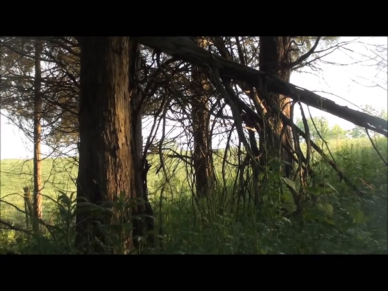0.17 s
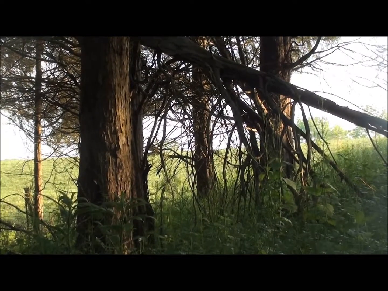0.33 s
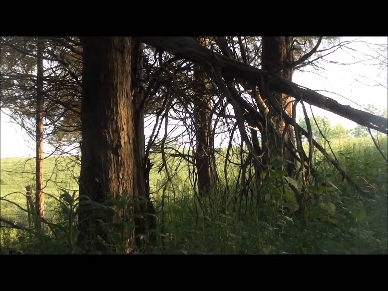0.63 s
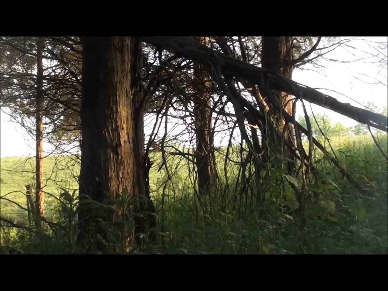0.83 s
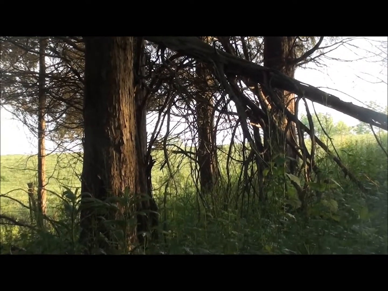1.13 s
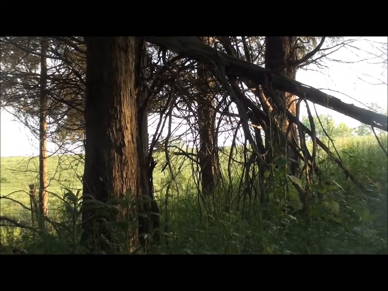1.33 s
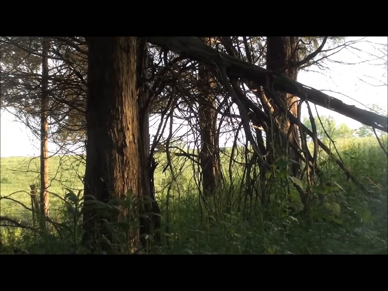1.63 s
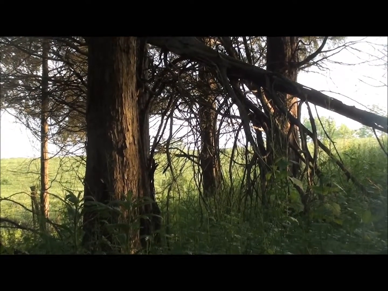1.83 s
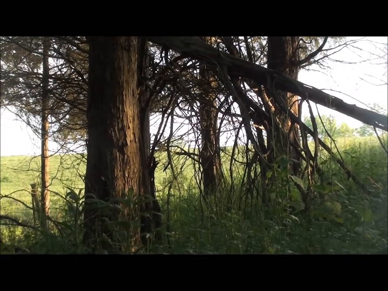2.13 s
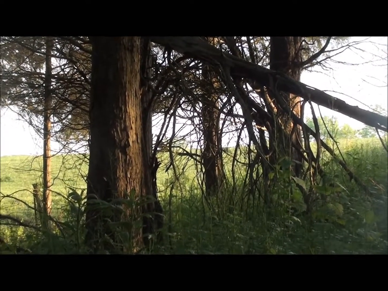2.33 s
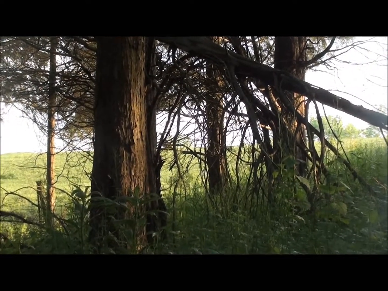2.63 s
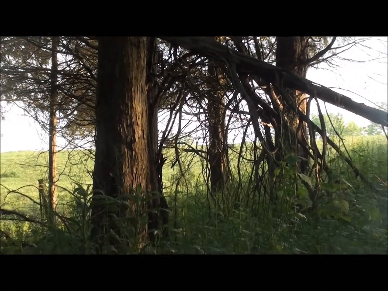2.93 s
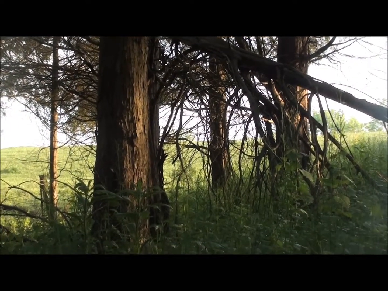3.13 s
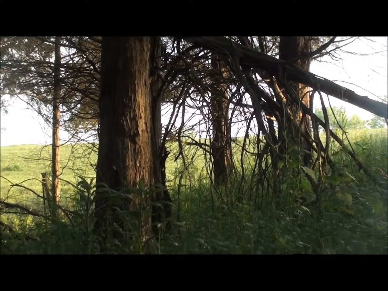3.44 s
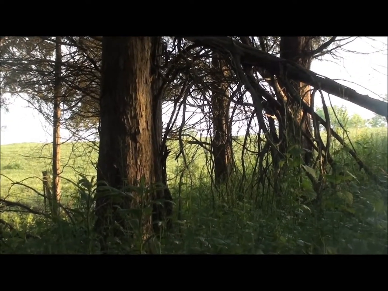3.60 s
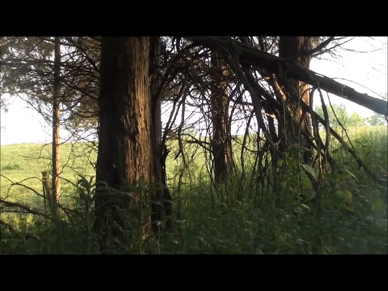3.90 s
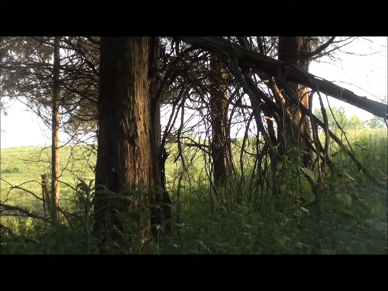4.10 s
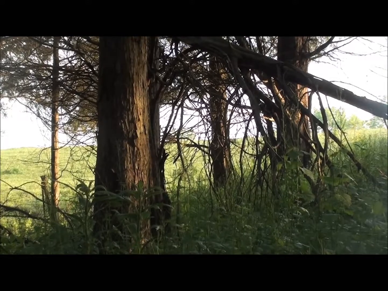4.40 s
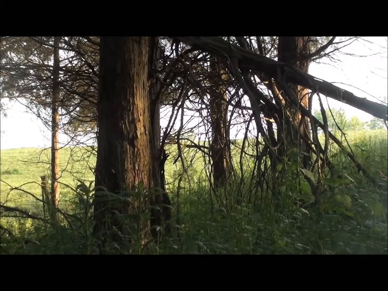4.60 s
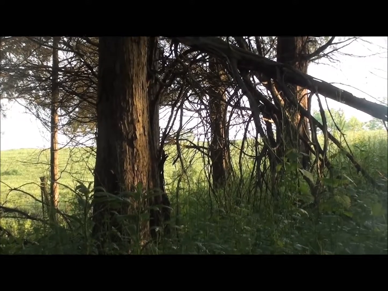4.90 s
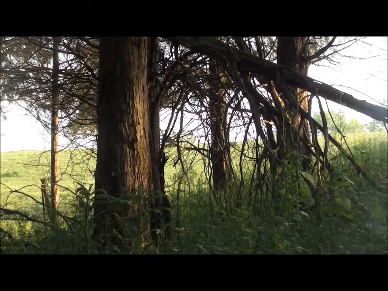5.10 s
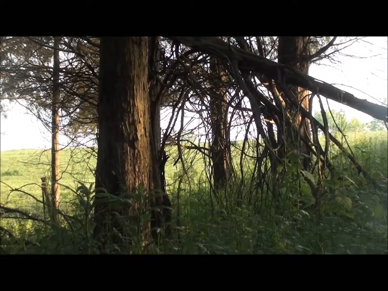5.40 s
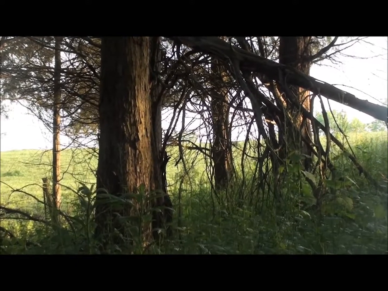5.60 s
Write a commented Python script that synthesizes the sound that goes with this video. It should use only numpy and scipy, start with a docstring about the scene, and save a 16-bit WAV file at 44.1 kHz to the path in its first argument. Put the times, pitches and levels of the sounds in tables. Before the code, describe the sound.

Quiet outdoor hush, then loud harsh turkey yelps nearby, a far faint gobble behind, and a quick closing burst of yelps.

```python
"""Quiet country air at a wooded field edge and a few faint ticks come first; then a turkey yelps close by.
Seven spaced yelps, then a fast run joined by a thin whistle: a membrane falls in pitch, breaks into a
fluttering rasp and swoops up again, coloured by the throat and scattered back by the trees.
A far gobble of hoarse syllables, a shrilling insect, a chirping small bird and soft clicks lie behind.
The camera's gain control ducks under the loud yelps and slowly lets the background back up."""
import sys
import numpy as np
from scipy import signal
from scipy.fft import rfft, irfft
from scipy.io import wavfile
from scipy.ndimage import uniform_filter1d, minimum_filter1d

SR = 44100
rng = np.random.default_rng(int(sys.argv[2]) if len(sys.argv) > 2 else 0)


def to_wav(s):
    """Save 16-bit WAV."""
    ch = np.atleast_2d(s).T  # columns
    pcm = np.round(np.clip(ch, -1, 1) * 32767)  # PCM
    wavfile.write(sys.argv[1], SR, pcm.astype(np.int16))


N = 253575
T = np.arange(N) / SR  # seconds
BINS = np.arange(N + 1) * SR / (2 * N)  # Hz, for a spectrum padded to twice the length
TOP_HZ = 15800  # top of the microphone's band

# Near turkey, one row a yelp; whistle_hz tops the whistle into the next yelp, 0 for none:
# start_s, rasp_length_s, climb_length_s, lowest_pitch_hz, effort_db, rasp_0_to_1, whistle_hz
YELPS = [ (1.732, .037, .018, 700, -17.5, .28, 0), (1.982, .056, .018, 750, -1, .45, 0),
         (2.263, .070, .021, 660, 0, .7, 0), (2.528, .091, .018, 570, .5, .68, 0),
         (2.839, .067, .024, 600, 1, .8, 0), (3.128, .074, .022, 630, 1, .8, 0),
         (3.444, .047, .033, 700, .5, .66, 0), (5.161, .059, .021, 570, -.5, .95, 2400),
         (5.287, .026, .012, 1320, 2, .16, 2950), (5.394, .039, .033, 750, 0, .88, 3050),
         (5.532, .041, .036, 770, 2, .56, 2900), (5.666, .085, .020, 740, 2.5, .56, 0)]
# Throat and open beak of the near turkey: frequency_hz, relative_level_db
THROAT = [(150, -26), (400, -11.5), (630, -4.5), (850, -5.5), (1100, -3), (1480, 2.5), (1900, -3),
          (2500, -10), (3400, -8), (4400, -7), (5300, -12), (6400, -23), (7700, -24), (10500, -47)]
# Near turkey at the two microphone ports: frequency_hz, left_minus_right_db
PORT_BALANCE = [(60, 0.5), (110, 0.5), (200, 0.5), (380, 0.5), (700, 1.5), (1290, 2.0), (2380, 2.5),
                (4400, 0.0), (8120, 0.0), (15000, 0.0)]
# Near turkey at the two microphone ports: frequency_hz, left_lead_radians
PORT_PHASE = [(0, 0), (600, -0.6), (1030, -0.5), (1290, -0.8), (1720, -0.5), (2150, -0.9), (3270, -0.4),
              (5170, -0.1), (5600, -0.2), (6290, -0.0), (15600, -0.0), (16000, -0.1)]
# What the trees send back: frequency_hz, level_db
WOODS_COLOUR = [(300, -30), (700, -13), (1150, -2), (1600, 0), (2000, -3), (2700, -12), (4500, -8),
                (8000, -18)]
# Syllables of the far gobble: middle_s
GOBBLE_SYLLABLES = [3.585, 3.635, 3.695, 3.775, 3.83, 3.87, 3.94, 4.01, 4.085, 4.155, 4.235, 4.29, 4.35]
# Colour of the far gobble: frequency_hz, relative_level_db
GOBBLE_COLOUR = [(300, -20), (540, 0), (720, -7), (950, 1), (1400, -3), (2000, -5), (2800, -17),
                 (4200, -18), (5000, -8), (5500, -23), (9000, -36)]
# Faint ticks and knocks; the last four, near 1400 Hz, are soft clicks, perhaps of the beak:
# time_s, level_db, centre_hz, decay_s
TICKS = [(.533, -34, 5500, .005), (.634, -35, 230, .012), (1.354, -43, 1000, .008),
         (1.475, -33, 1200, .004), (1.542, -31, 1600, .011), (4.931, -25, 1400, .003),
         (4.970, -25.5, 1400, .003), (5.125, -28, 1400, .002), (5.133, -23, 1400, .002)]
# Spectrum of the open air: frequency_hz, relative_density_db_per_hz
AIR_COLOUR = [(25, -28), (45, -18), (70, -2), (120, -6), (200, -10), (300, -15), (500, -16), (800, -19),
              (1300, -22.5), (2400, -21.5), (3500, -25), (6000, -25), (10000, -27.5), (15500, -29)]
# Stereo width of the air, before its overall side level: frequency_hz, side_minus_mid_db
AIR_SIDE = [(60, -25), (110, -20), (200, -12), (380, -4), (700, -1), (1290, 0), (2380, -4), (4400, -6),
            (8120, -11), (15000, -23)]
# Faint, nearly steady tones in the air: frequency_hz, level_db
HUM = [(80, -57), (842, -64), (2523, -64)]

# Yelp pitch
BREAK_HZ = 940  # the voice turns raspy below about this pitch
ONSET_HZ, ONSET_OCT_PER_DB = 1330, .045  # a yelp out of silence starts higher the harder it is pushed
END_HZ, END_OCT_PER_DB = 2100, .02  # and it climbs higher at its end
FALL_S, HARSH_FALL_S = .019, .005  # fall into the trough, for a clear and for a fully raspy yelp
RUN_ONSET_HZ, RUN_FALL_S = 2250, .012  # the fall out of a whistle
TROUGH_POWER, EDGE_RASP = 2.4, .55  # flatness of the pitch trough; share of the rasp left at its edges
LEAP_S, LEAP_SHARE = .006, .7  # leap out of the rasp to this share of the end pitch
CLEAR_RASP = .07  # rasp left in the climb and the whistle

# Yelp level and partials
FADE_S = .008  # to and from silence
ONSET_DB, FALL_DB, END_DB, WHISTLE_DB = -15, -2.5, -22, -32  # re the trough
CLIMB_DB_PER_S, CLIMB_SAG_DB = -220, -3.5  # a slower climb is softer, and weakens on the way up
FUNDAMENTAL_DB, FUNDAMENTAL_PER_DB = -1.5, -1.1  # re the octave: effort shifts energy up into the octave
PURE_PER_DB = .2  # the fundamental gains as the note thins out towards its ends and in the whistle
LOCK_HZ, LOCK_WIDTH_HZ, LOCK_DB = 1500, 230, 7  # a partial on the throat's main resonance takes over
# upper partials: when clear, gain at full rasp, loss at the trough's edges
UPPER_DB, UPPER_RASP_DB, UPPER_EDGE_DB = -14.5, 13.5, -8
FLUTTER_HZ, FLUTTER_RASP_HZ = 110, 160  # mean flutter rate when clear, and its gain at full rasp

# Far and faint sources
GOBBLE_HZ, GOBBLE_SAG_HZ_PER_S = 605, 150  # its pitch sags as it goes on
GOBBLE_DB, GOBBLE_HOLD_S, GOBBLE_FADE_DB_PER_S = -34.5, .5, 30  # its level holds, then fades
INSECT_START_S, INSECT_STOP_S, INSECT_FADE_S, INSECT_DB = 2.65, 5.25, .3, -45.5
INSECT_HZ, INSECT_RISE_HZ_PER_S = 3380, 160  # the shrilling creeps up in pitch
INSECT_WIDTH_HZ, INSECT_SPREAD_HZ_PER_S = 60, 65  # and grows coarser
CHIRP_START_S, CHIRP_EVERY_S, CHIRP_HZ, CHIRP_DB = 4.017, .137, 5020, -47
TICK_WIDTH_OCT, TICK_ATTACK_S = .5, .0006
AIR_DB = -44  # level of the mid channel, before the rumble wanders

# Gain control; it starts this far turned down
AGC_THRESHOLD_DB, AGC_RELEASE_S, AGC_START_DB = -8.5, 2.05, 8


def undb(db):
    """Decibels to gain."""
    return 10 ** (np.asarray(db) / 20)


def unit(x):
    """Scale to rms 1."""
    return x / np.sqrt(np.mean(x ** 2))


def over_bins(points):
    """Join (Hz, value) points on a log-frequency axis."""
    hz, value = np.transpose(points)
    return np.interp(np.log(BINS + 1), np.log(hz), value)


def filtered(x, gain):
    """Apply one gain per frequency."""
    return irfft(rfft(x, 2 * N) * gain)[..., :N]


def body(points):
    """Causal, minimum-phase response of a resonating body with this (Hz, dB) outline."""
    cepstrum = irfft(np.log(undb(over_bins(points))))
    cepstrum[1:N] *= 2
    cepstrum[N + 1:] = 0
    return np.exp(rfft(cepstrum))


def wander(hz):
    """Smooth chance of spread 1 that moves little faster than hz."""
    return unit(filtered(rng.standard_normal(N), 1 / (1 + (BINS / hz) ** 4)))


def pulses(hz, first_db, upper_db, tilt_db, bend=0, count=16):
    """Partials of a vibrating membrane: fundamental, octave, and upper ones tilted by tilt_db an octave."""
    phase = 2 * np.pi * np.cumsum(hz) / SR + bend
    low = undb(first_db) * np.cos(phase) + np.cos(2 * phase)
    upper = 0
    for k in range(3, count):
        level = undb(tilt_db * np.log2(k / 3)) * (k * hz < TOP_HZ)
        upper = upper + level * np.cos(k * phase + rng.uniform(0, 2 * np.pi))
    return low + undb(upper_db) * upper


def turkey(jitter=.12, slip=.42, shimmer=.45, beat=.9, pull=.4, flutter_drift=.17, hiss_db=-6.5,
           clear_db=-3, tilt_db=-2.5, swap_db=6, pure_db=3.5, stiff_hz=4300):
    """One membrane sets the pitch; a slower, unsteady flutter chops and bends it; the throat colours both."""
    hz, db, rasp, flutter_hz, first_db, upper_db = gestures()
    flap = 2 * np.pi * np.cumsum(flutter_hz * (1 + flutter_drift * wander(90))) / SR
    rasp = np.clip(rasp, 0, 1)
    hz = hz * (1 + (.003 + jitter * rasp ** 1.5) * wander(90))
    bend = rasp * (pull * np.sin(flap) + slip * wander(380))
    # once the voice breaks, upper partials grow and energy swaps to and fro between fundamental and octave
    broken = np.clip(rasp / .38, 0, 1)
    first_db = np.maximum(first_db, first_db * broken)
    first_db = first_db + pure_db * (1 - broken) + swap_db * rasp * wander(70)
    bright_db = upper_db + clear_db * (1 - broken) + 4 * rasp * wander(60)
    tone = pulses(hz, first_db, bright_db, tilt_db, bend=bend)
    # in the clear notes the membrane no longer slaps shut, so the highest partials drop away
    soft = filtered(tone, .15 + .85 / (1 + (BINS / stiff_hz) ** 12))
    tone = broken * tone + (1 - broken) * soft
    # air tears through the gap: the hiss follows the size of the membrane's swing
    hiss = undb(hiss_db + .8 * upper_db) * rasp ** 1.5 * rng.standard_normal(N) * (2 + 2 * np.abs(tone))
    # the flutter is deep and regular in a light rasp and gives way to chaos in a harsh one
    flutter = beat * broken ** 2 * (1.2 - rasp) * np.cos(flap)
    chop = np.maximum(1 + flutter + shimmer * rasp * wander(220), .1)
    voice = filtered((tone + hiss) * chop, body(THROAT))
    # the drive, not the pitch, decides how loud the note comes out
    power = uniform_filter1d(uniform_filter1d(voice ** 2, size=260), size=260)
    return voice / np.sqrt(power + 1e-9) * undb(db + 1.4 * rasp * wander(60))


def gestures():
    """String the yelps into pitch, level, rasp, flutter, fundamental and upper partials."""
    knots, in_run = [], False
    for i, (start, hold, climb, low, effort, rasp, whistle_hz) in enumerate(YELPS):
        note = yelp(start, hold, climb, low, effort, rasp, in_run)
        first = note[0][1]
        end, last = note[-1][:2]
        if not in_run:
            note.append((start - FADE_S, first, -70, 0, UPPER_EDGE_DB))
        in_run = whistle_hz > 0
        if in_run:
            note += whistle(end, YELPS[i + 1][0], last, whistle_hz, effort)
        else:
            note.append((end + FADE_S, last, -70, 0, UPPER_EDGE_DB))
        # effort and rasp set the colour
        flutter = FLUTTER_HZ + FLUTTER_RASP_HZ * rasp
        locked = np.exp(-((np.array([low, 2 * low]) - LOCK_HZ) / LOCK_WIDTH_HZ) ** 2)
        fundamental = FUNDAMENTAL_DB + FUNDAMENTAL_PER_DB * effort + LOCK_DB * (locked[0] - locked[1])
        upper = max(fundamental, 0) + UPPER_DB + UPPER_RASP_DB * rasp
        for s, hz, db, rough, dulling in note:
            thinned = fundamental + PURE_PER_DB * (effort - db)
            knots.append((s, hz, db, rough, flutter, thinned, upper + dulling))
    s, *columns = np.transpose(sorted(knots))
    return [uniform_filter1d(np.interp(T, s, c), size=130) for c in columns]


def yelp(start, hold, climb, low, effort, rasp, in_run):
    """One yelp as points (s, Hz, dB, rasp, upper partials dB): fall, raspy trough, leap to a rising note."""
    first = RUN_ONSET_HZ if in_run else ONSET_HZ * 2 ** (ONSET_OCT_PER_DB * effort)
    last = END_HZ * 2 ** (END_OCT_PER_DB * effort)
    fall = RUN_FALL_S if in_run else np.interp(rasp, [0, 1], [FALL_S, HARSH_FALL_S])
    broken = start + fall
    mended = broken + hold
    end = mended + climb
    edge = max(BREAK_HZ, 1.15 * low)
    entry = min(edge, first)
    climb_db = effort + CLIMB_DB_PER_S * climb
    falling = [(start, first, effort + ONSET_DB, 0, UPPER_EDGE_DB),
               (start + .6 * fall, np.sqrt(first * entry), effort + FALL_DB, .2 * rasp, UPPER_EDGE_DB)]
    trough = []
    for u in np.linspace(-1, 1, 9):  # from edge to edge, lowest at 0
        side_hz = entry if u < 0 else edge
        hz = low + (side_hz - low) * abs(u) ** TROUGH_POWER
        rough = rasp * (1 - (1 - EDGE_RASP) * u * u)
        trough.append((broken + hold * (u + 1) / 2, hz, effort, rough, UPPER_EDGE_DB * u * u))
    rising = [(mended + LEAP_S, LEAP_SHARE * last, climb_db, .15 * rasp, UPPER_EDGE_DB),
              (end - .35 * climb, .83 * last, climb_db + CLIMB_SAG_DB, CLEAR_RASP, UPPER_EDGE_DB),
              (end, last, effort + END_DB, CLEAR_RASP, UPPER_EDGE_DB)]
    return falling + trough + rising


def whistle(start, stop, from_hz, top_hz, effort):
    """In a run the tightened membrane keeps singing in an arch up to the next yelp."""
    points = []
    for u in np.linspace(-1, 1, 8)[1:-1]:
        side_hz = from_hz if u < 0 else RUN_ONSET_HZ
        hz = top_hz + (side_hz - top_hz) * u * u
        s = start + (stop - start) * (u + 1) / 2
        points.append((s, hz, effort + WHISTLE_DB, CLEAR_RASP, UPPER_EDGE_DB))
    return points


def undergrowth(x, wet_db=-24, t60=.23):
    """Stems and the ground close by add a brief, bright blur."""
    tail = rng.standard_normal(N) * np.exp(-np.log(1000) * T / t60) * (T > .002)
    return undb(wet_db) * signal.fftconvolve(x, tail / np.sqrt(np.sum(tail ** 2)))[:N]


def ports(x):
    """The near bird reaches the two microphone ports with different level and phase, mostly louder left."""
    half = undb(over_bins(PORT_BALANCE) / 2) * np.exp(.5j * over_bins(PORT_PHASE))
    return np.array([filtered(x, half), filtered(x, 1 / half)])


def woods(x, wet_db, t60, first_s=.01, side=.4):
    """Trunks and the field edge scatter back mostly the middle of the sound, as a decaying noise tail."""
    decay = np.exp(-np.log(1000) * T / t60)
    build_up = 1 - np.exp(-(T / first_s) ** 2)
    tails = rng.standard_normal((2, N)) * decay * build_up
    colour = undb(over_bins(WOODS_COLOUR))
    mid, wide = (filtered(signal.fftconvolve(x, tail / np.sqrt(np.sum(tail ** 2)))[:N], colour)
                 for tail in tails)
    return undb(wet_db) * np.array([mid + side * wide, mid - side * wide])


def gobble(length_s=.014, jitter=.07, arch=.06, hiss_db=8, upper_db=-2, tilt_db=-1):
    """A far tom rattles off hoarse syllables, each a small arch in pitch; the series sags and fades."""
    since = np.clip(T, GOBBLE_SYLLABLES[0], GOBBLE_SYLLABLES[-1]) - GOBBLE_SYLLABLES[0]
    bumps = np.exp(-.5 * ((T - np.array(GOBBLE_SYLLABLES)[:, None]) / length_s) ** 2).sum(0)
    sagging_hz = GOBBLE_HZ - GOBBLE_SAG_HZ_PER_S * since
    pitch = sagging_hz * (1 + arch * (bumps - 1) + jitter * wander(250))
    source = pulses(pitch, 0, upper_db, tilt_db) + undb(hiss_db) * rng.standard_normal(N)
    db = GOBBLE_DB - GOBBLE_FADE_DB_PER_S * np.maximum(since - GOBBLE_HOLD_S, 0)
    return unit(filtered(source, body(GOBBLE_COLOUR))) * undb(db) * bumps


def insect(scrape_hz=210):
    """A narrow shrilling far out in the grass, a jittered tone in random scrapes: it fades in and out."""
    since = np.maximum(T - INSECT_START_S, 0)
    envelope = np.clip(np.minimum(since, INSECT_STOP_S - T) / INSECT_FADE_S, 0, 1)
    hz = INSECT_HZ + INSECT_RISE_HZ_PER_S * since
    width = INSECT_WIDTH_HZ + INSECT_SPREAD_HZ_PER_S * since
    phase = 2 * np.pi * np.cumsum(hz + width * wander(1200)) / SR
    shrill = np.sin(phase) * wander(scrape_hz) + np.cos(phase) * wander(scrape_hz)
    return undb(INSECT_DB) * envelope * unit(shrill)


def chirps(length_s=.011, waver_hz=90, count=3):
    """A small far bird gives a few thin, evenly spaced chirps, each a short wavering tone."""
    middles = CHIRP_START_S + CHIRP_EVERY_S * np.arange(count)
    bumps = np.exp(-.5 * ((T - middles[:, None]) / length_s) ** 2).sum(0)
    phase = 2 * np.pi * np.cumsum(CHIRP_HZ + waver_hz * wander(400)) / SR
    return undb(CHIRP_DB) * bumps * unit(np.sin(phase))


def ticks():
    """Faint ticks and knocks, then four soft clicks, perhaps of the beak: short bursts of band-limited noise."""
    out = np.zeros(N)
    for s, db, hz, decay in TICKS:
        band = np.exp(-.5 * (np.log2((BINS + 1) / hz) / TICK_WIDTH_OCT) ** 2)
        ring = unit(filtered(rng.standard_normal(N), band))
        envelope = np.clip((T - s) / TICK_ATTACK_S, 0, 1) * np.exp(-np.abs(T - s) / decay)
        out += undb(db) * ring * envelope
    return out


def air(rumble_walk_db=1.5, side_db=-4):
    """Low far rumble, soft hiss and a faint hum, nearly alike on both sides."""
    colour = undb(over_bins(AIR_COLOUR))
    mid, side = (unit(filtered(rng.standard_normal(N), colour)) for _ in range(2))
    side = undb(side_db) * filtered(side, undb(over_bins(AIR_SIDE)))
    rumble = filtered(mid, 1 / (1 + (BINS / 400) ** 2))
    mid = mid + rumble * (undb(rumble_walk_db * wander(6)) - 1)
    hum = np.zeros(N)
    for hz, db in HUM:
        hum += undb(db) * unit(np.sin(2 * np.pi * np.cumsum(hz + 2 * wander(8)) / SR))
    return undb(AIR_DB) * np.array([mid + side, mid - side]) + hum


def scene():
    """The near bird and its echo, the far tom, an insect, a small bird, faint ticks and clicks, and the air."""
    near = turkey()
    tom = gobble()
    small = insect() + chirps() + ticks()
    close = ports(near + undergrowth(near)) + woods(near, wet_db=-25.5, t60=.9)
    far = tom + woods(tom, wet_db=1, t60=.9)
    faint = small + woods(small, wet_db=-7, t60=.6)
    return close + far + faint + air()


def gain_control(x):
    """Turn down at once by as much as the level passes the threshold, then recover slowly."""
    power = np.abs(uniform_filter1d(np.mean(x ** 2, axis=0), size=300))
    level_db = 10 * np.log10(power + 1e-12)
    recovery = np.exp(-T / AGC_RELEASE_S)
    # dividing by the recovery lets a running maximum hold the strongest cut still in force
    wanted = np.maximum((level_db - AGC_THRESHOLD_DB) / recovery, AGC_START_DB)
    cut_db = recovery * np.maximum.accumulate(wanted)
    return x * undb(-cut_db)


def record(dry, ceiling=.95):
    """The camera's gain control rides the level, a fast limiter holds down the peaks; the top is cut."""
    ridden = gain_control(dry)
    allowed = np.minimum(1, ceiling / (np.abs(ridden).max(axis=0) + 1e-9))
    held = minimum_filter1d(allowed, size=81)
    gain = uniform_filter1d(uniform_filter1d(held, size=41), size=41)
    top_cut = signal.ellip(10, .2, 80, TOP_HZ, fs=SR, output="sos")
    return signal.sosfilt(top_cut, ridden * gain)


dry = scene()
out = record(dry)
to_wav(out)
```